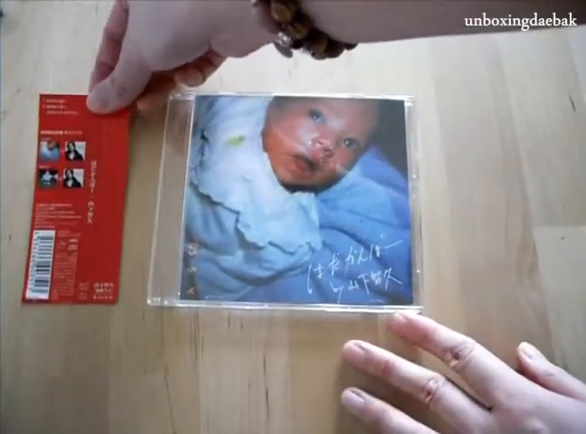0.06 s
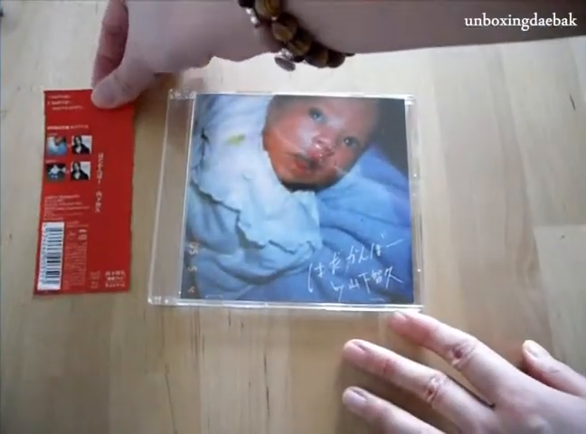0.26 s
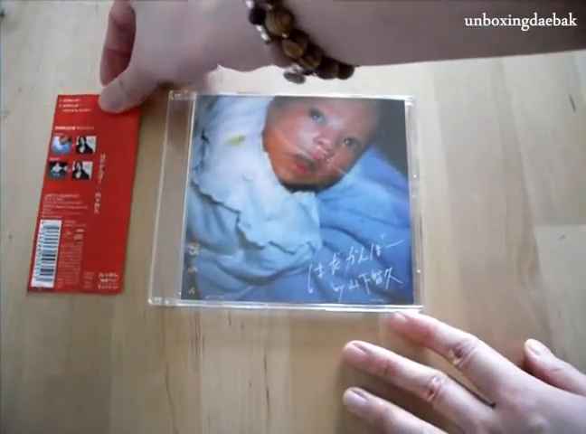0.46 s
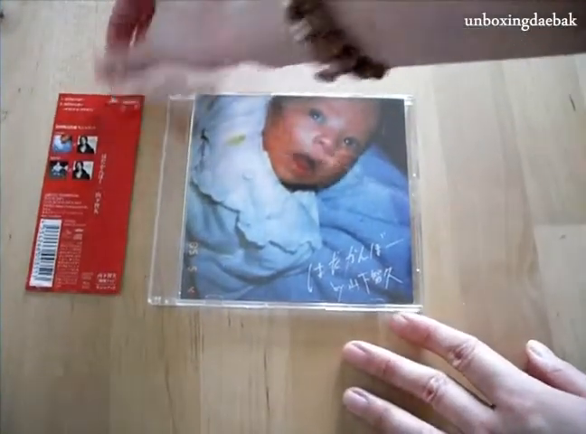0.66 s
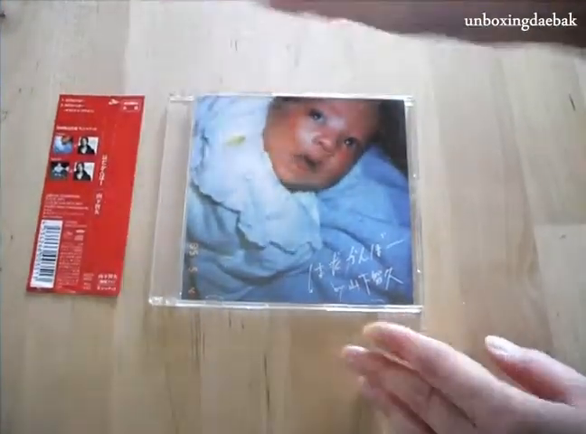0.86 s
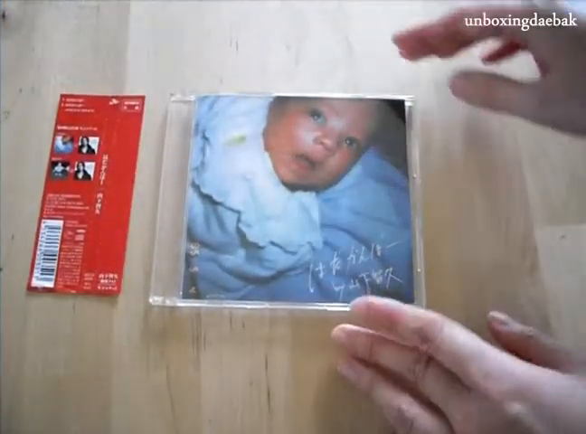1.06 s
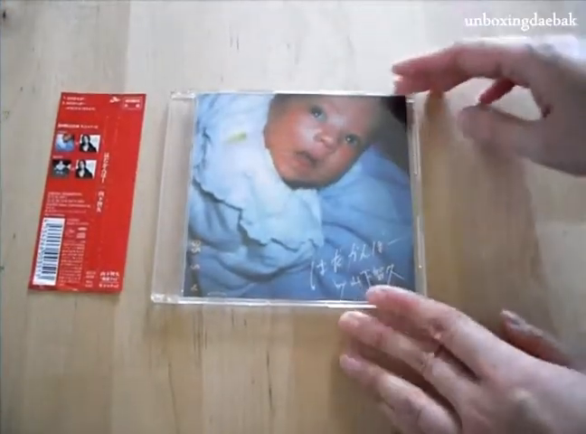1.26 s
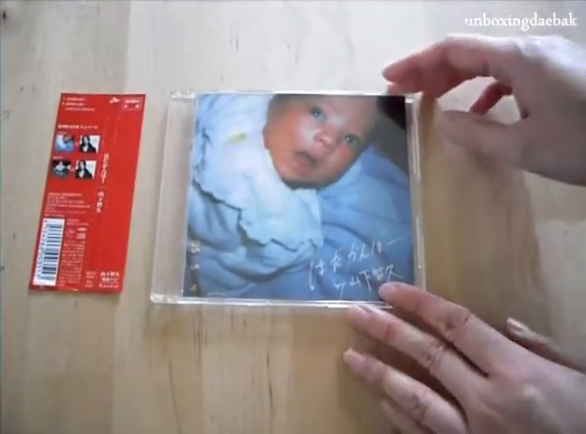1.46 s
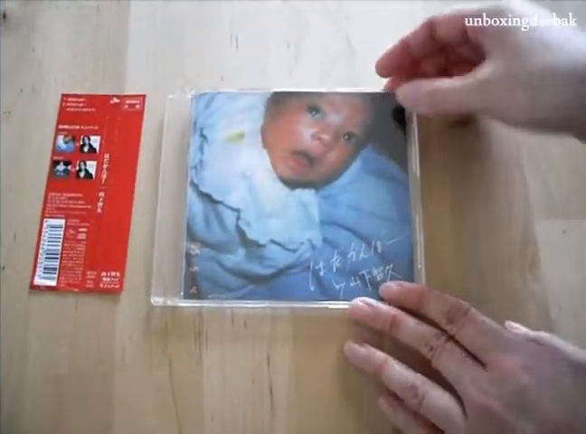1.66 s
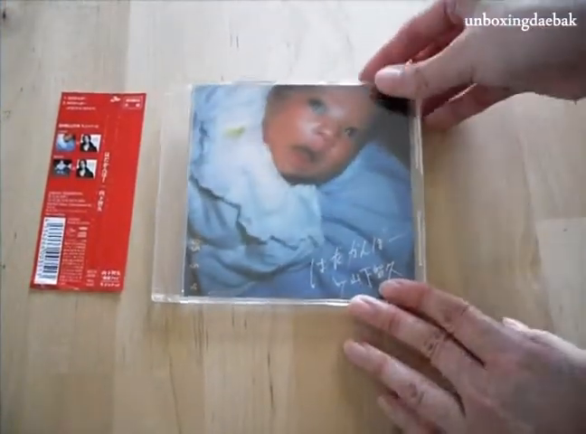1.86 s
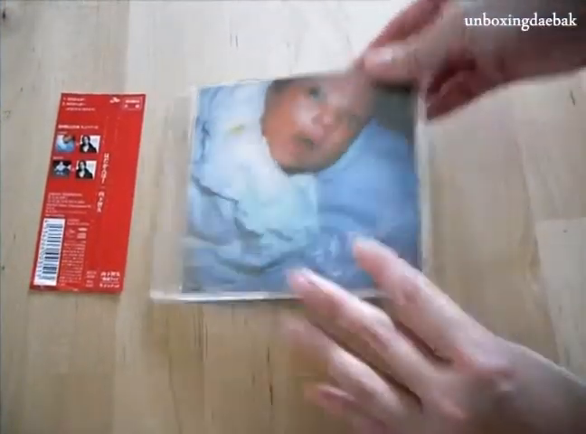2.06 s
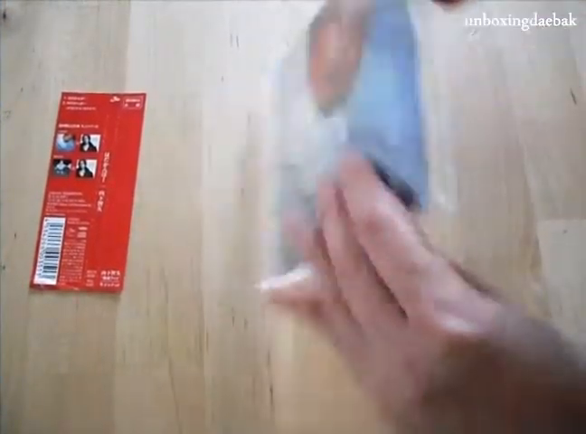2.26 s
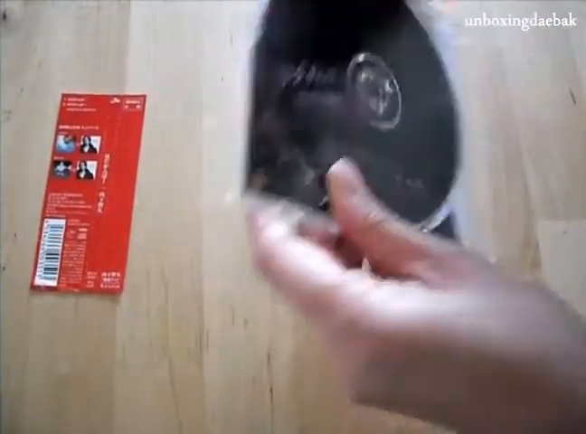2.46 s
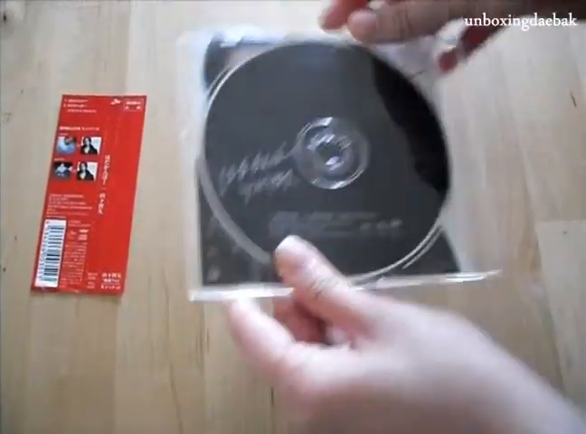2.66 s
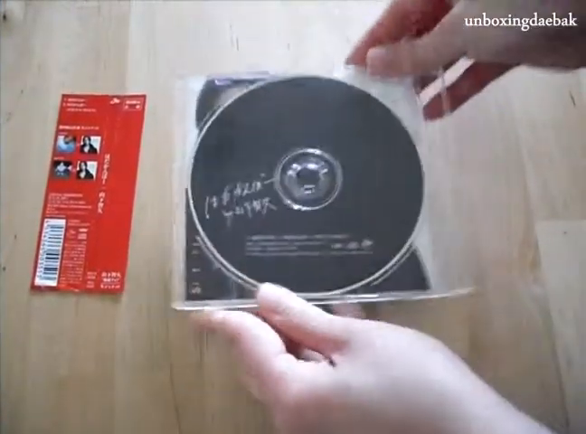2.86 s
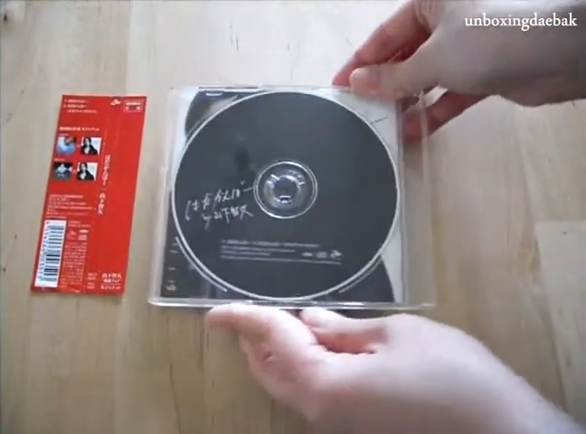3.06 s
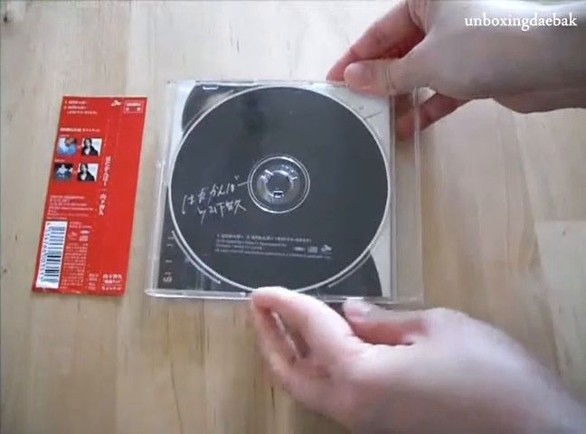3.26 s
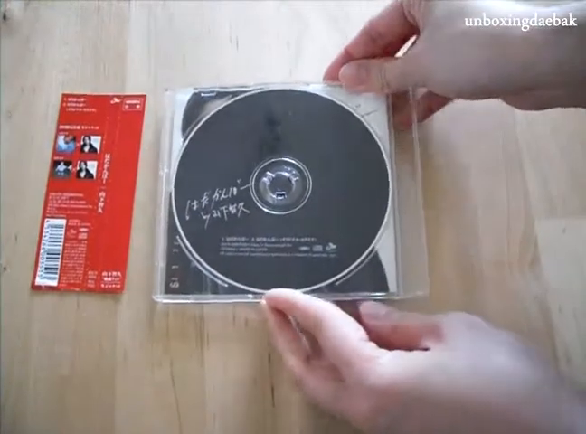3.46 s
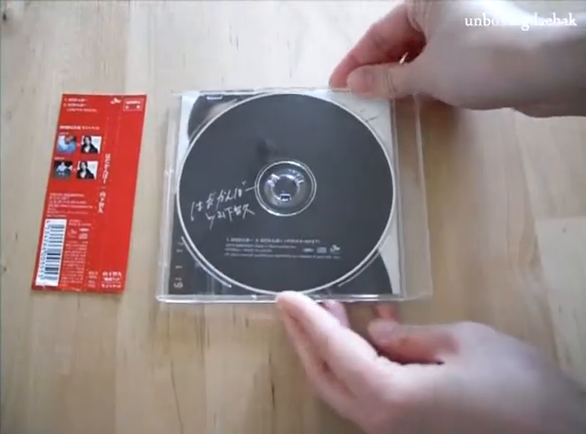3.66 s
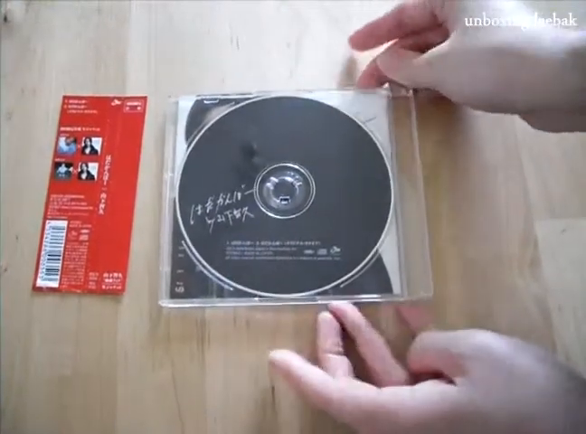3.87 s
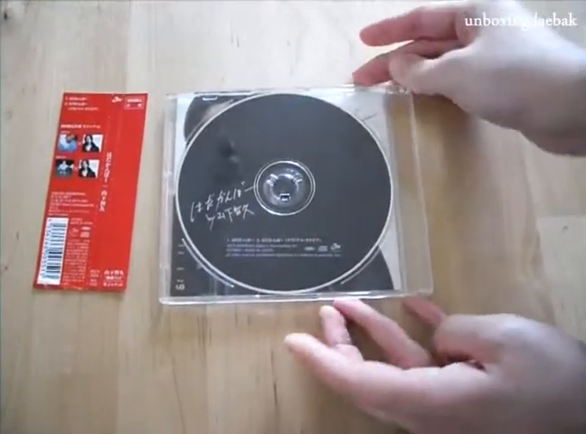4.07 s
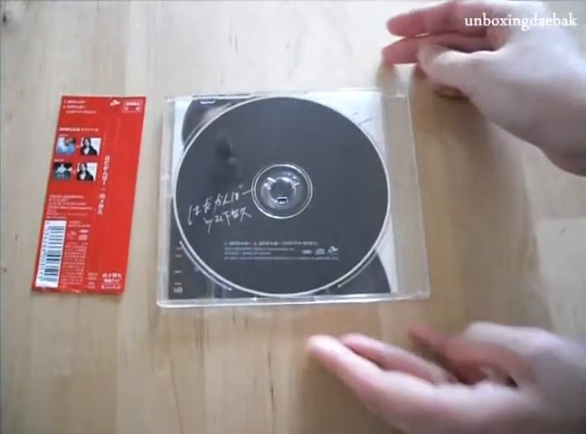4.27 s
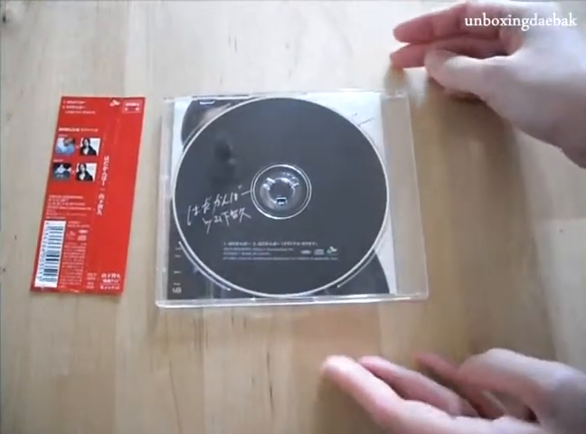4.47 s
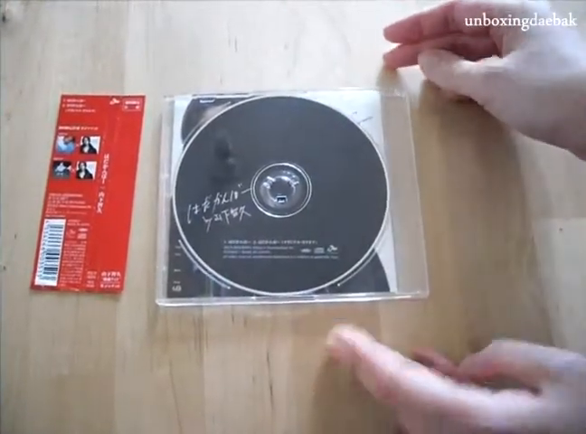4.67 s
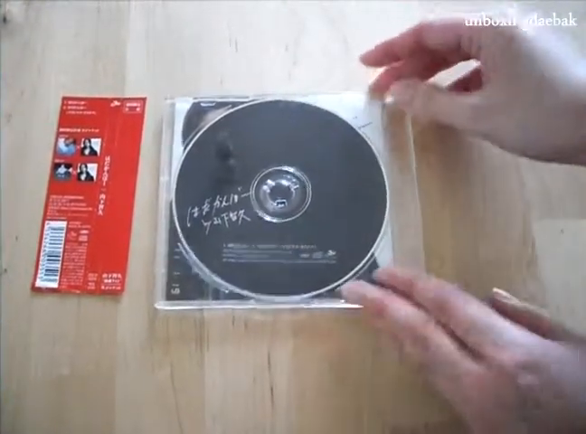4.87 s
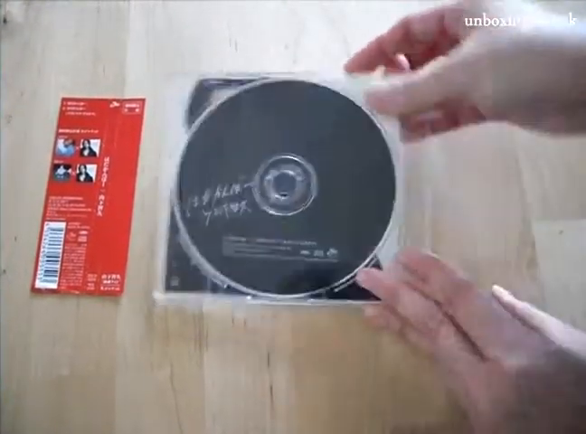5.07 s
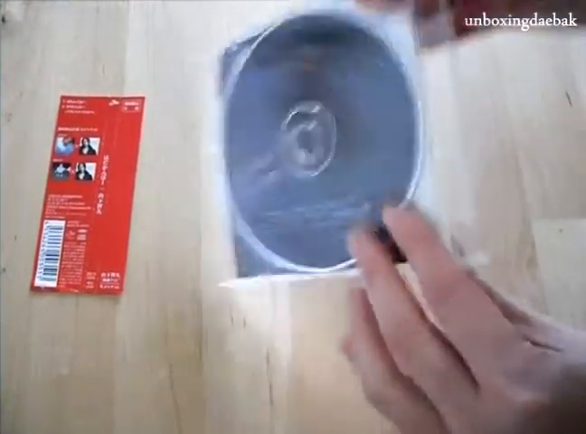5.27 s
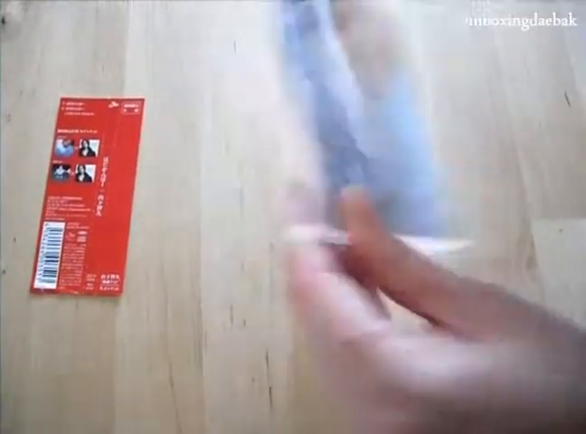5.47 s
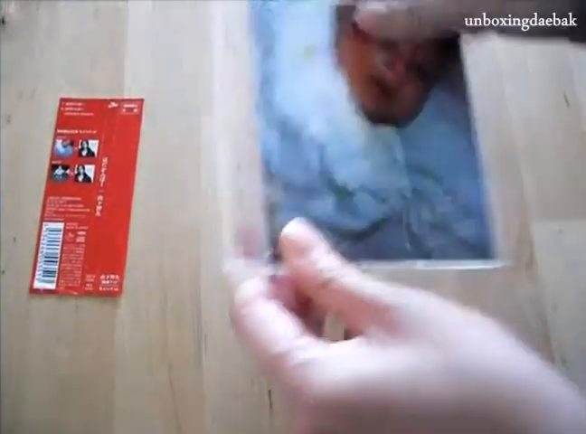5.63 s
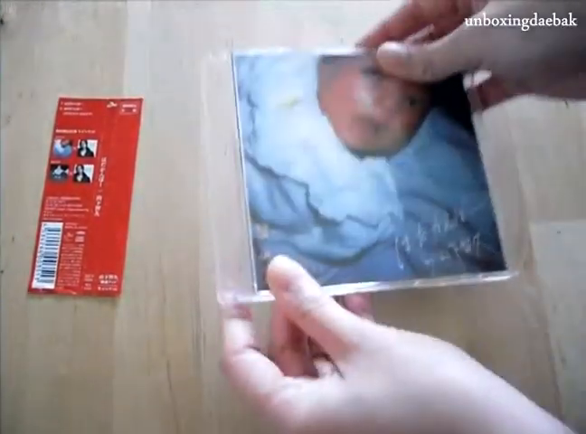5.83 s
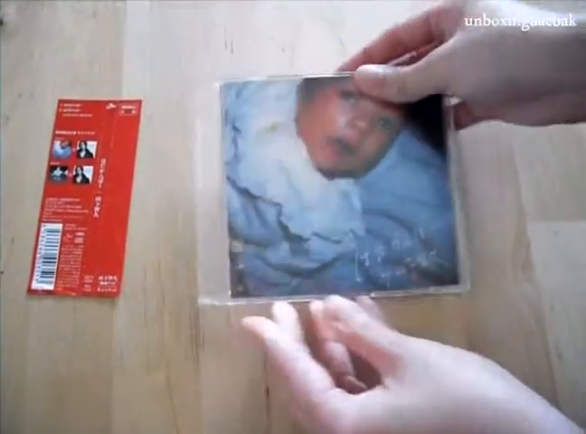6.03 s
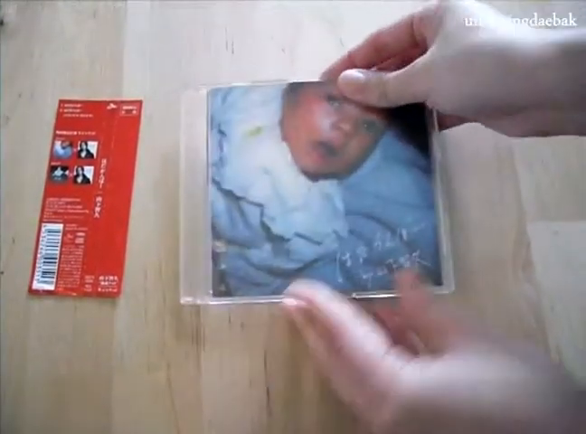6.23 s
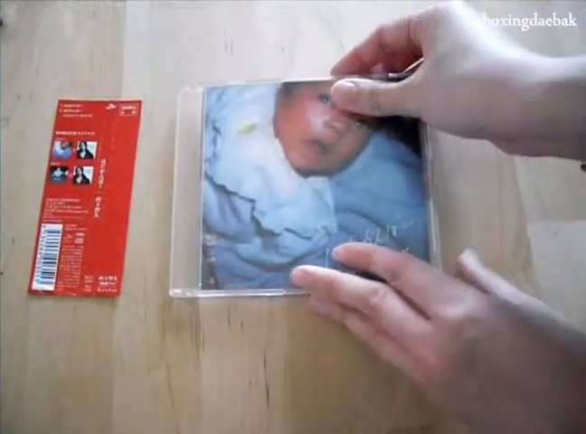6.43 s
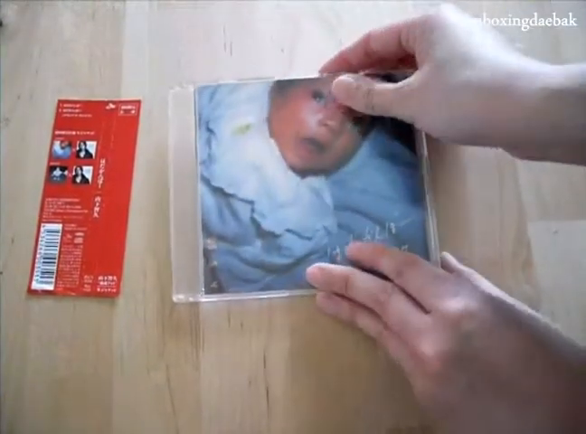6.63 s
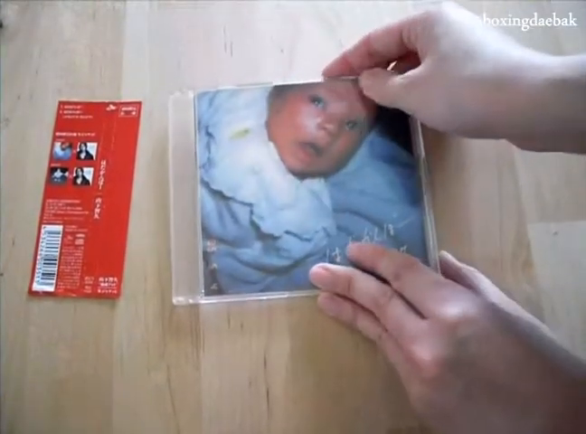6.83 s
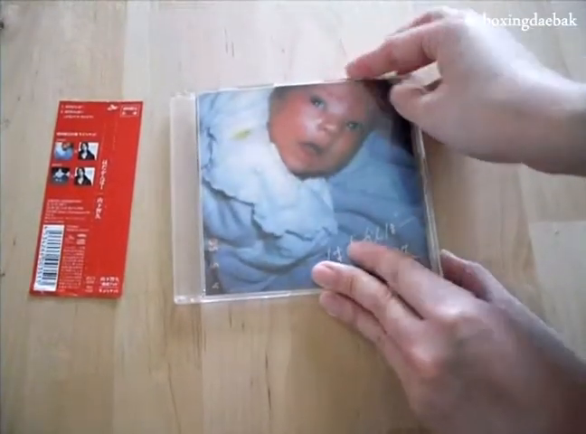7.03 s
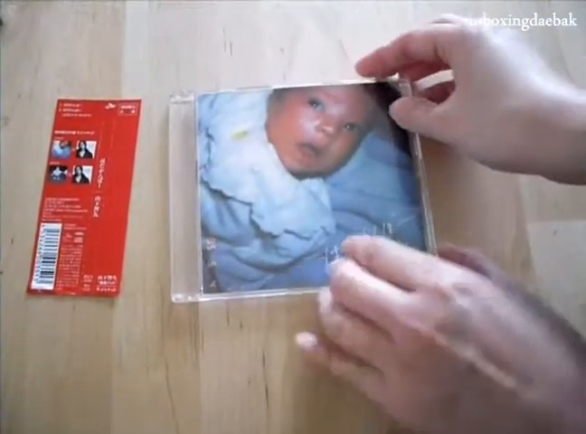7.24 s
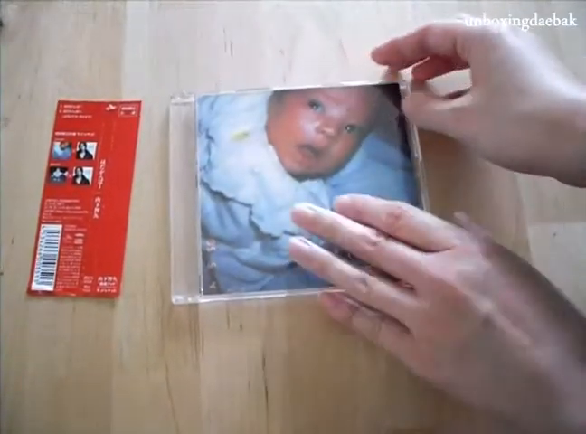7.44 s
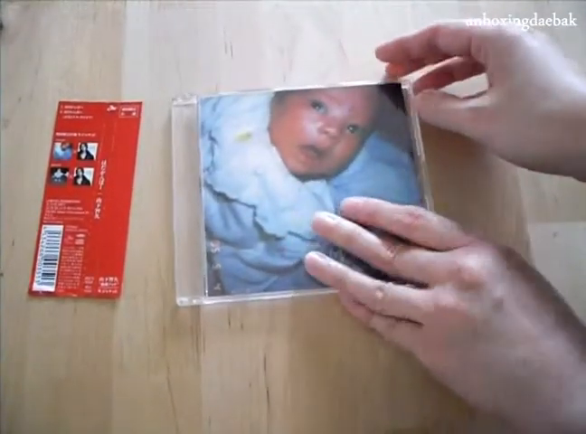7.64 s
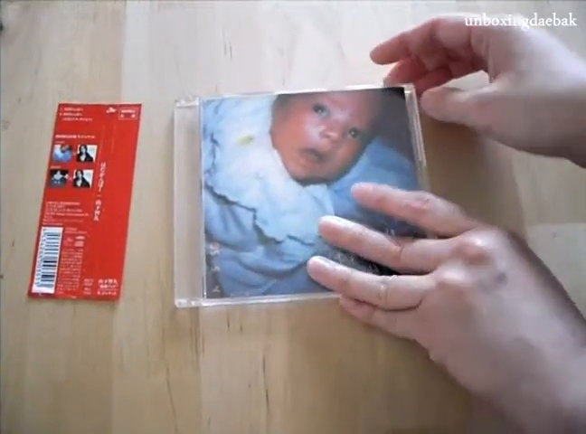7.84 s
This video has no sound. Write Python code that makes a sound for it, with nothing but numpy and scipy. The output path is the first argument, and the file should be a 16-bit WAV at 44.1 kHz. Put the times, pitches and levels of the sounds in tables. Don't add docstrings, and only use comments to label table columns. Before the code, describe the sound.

Close, dry handling of a hard plastic case on a wooden tabletop. Soft paper grit and thin ticks lead to a crisp lifting knock and scrape, then a gentle landing and a dull bump. After a quiet pause come rattling clicks, skin rubs, a snap and a heavy flat landing with quick bounces, then sparse faint taps. Soft room rumble and slightly muffled hiss remain underneath.

```python
import sys
import numpy as np
from scipy import signal
from scipy.fft import rfft, irfft
from scipy.io import wavfile
from scipy.ndimage import uniform_filter1d

SR = 44100
rng = np.random.default_rng(int(sys.argv[2]) if len(sys.argv) > 2 else 0)


def amplitude_ratio(level_db):
    exponent = np.asarray(level_db, float) / 20
    return 10 ** exponent


def output_pcm(signal):
    pcm = np.clip(np.atleast_2d(signal).T, -1, 1) * 32767
    wavfile.write(sys.argv[1], SR, np.round(pcm).astype(np.int16))


N = 348390

SLIP_SPREAD_DB = 1.3


def band(x, lo_hz, hi_hz):
    return signal.sosfilt(signal.butter(3, [lo_hz, hi_hz], "band", fs=SR, output="sos"), x)


def rms(x):
    return np.sqrt(np.mean(x ** 2)) + 1e-12


def fade(t, t60):
    return np.exp(-np.log(1000) * t / np.maximum(t60, .004))


def add(out, x, s):
    i = max(int(s * SR), 0)
    out[i:i + len(x)] += x[:N - i]


def even(x, width_hz):
    spectrum = rfft(x)
    size = max(int(width_hz * len(x) / SR), 1)
    power = uniform_filter1d(np.abs(spectrum) ** 2, size)
    return irfft(spectrum / np.sqrt(power + 1e-18), len(x))


def colour(x, points, near_hz=1000, focus_db=0):
    f = np.log(np.maximum(np.fft.rfftfreq(len(x), 1 / SR), 1))
    hz, db = np.transpose(points)
    lift = focus_db * np.exp(-((f - np.log(near_hz)) / 0.25) ** 2)
    return irfft(rfft(x) * amplitude_ratio(np.interp(f, np.log(hz), db) + lift), len(x))


def slide(s, db, rise, hold, fall):
    return s + np.array([-rise, 0, hold, hold + fall]), db - 20 * np.array([1, 0, 0, 1])


def slips(t, rate, spread_db):
    happens = rng.random(len(t)) < rate / SR
    return happens * rng.standard_normal(len(t)) * amplitude_ratio(spread_db * rng.exponential(size=len(t)))


def judder(t):
    depth_db, spurt_s = 2.5, .006
    spurts = uniform_filter1d(rng.standard_normal(len(t)), int(spurt_s * SR))
    return amplitude_ratio(depth_db * spurts / rms(spurts))


def ring(hz, db, t60):
    t = np.arange(SR // 8) / SR
    turn = 2 * np.pi * (hz[:, None] * t + rng.random((len(hz), 1)))
    return (amplitude_ratio(db)[:, None] * np.sin(turn) * fade(t, t60[:, None])).sum(axis=0)


def body(push, near_hz, t60, focus_db, modes_db):
    # f/Hz, level/dB, ring time as a share of the knock's
    plate_modes = [(880, 17.5, 0.37), (1300, 7.5, 0.19), (1590, -6, 1), (1810, 9, 0.87), (1970, -19, 0.44),
                   (2410, -29, 1.06), (2660, -21, 1.8), (3080, -2, 1.24), (3340, 6, 0.66),
                   (3620, -19, 0.93), (4630, -13, 0.57), (4700, -8, 0.55), (6160, -7.5, 0.67),
                   (7380, -15, 0.81)]
    # f/Hz, width/Hz, level/dB
    wood_modes = [(65, 35, -4.5), (129, 110, -14.5), (248, 53, -1), (412, 71, 3), (504, 78, -4),
                  (700, 96, 9.5), (860, 120, -34)]
    # f/Hz, level/dB per Hz
    plastic_colour = [(290, -50), (500, -12), (1800, 2.5), (2120, 0.5), (2460, 4.5), (2830, -1),
                      (4580, -10), (5540, -16.5), (7230, -19.5), (8850, -25), (10300, -52), (13400, -73),
                      (22000, -120)]
    edge_hz = 4000

    hz, db, share = np.transpose(plate_modes)
    grip = rng.standard_normal((2, len(hz)))
    db = np.append(db + 2.5 * grip[0], focus_db)
    hz = np.append(hz * (1 + 0.0092 * grip[1]), near_hz)
    modes = signal.fftconvolve(even(push, 400), ring(hz, db, t60 * np.append(share, .8)))

    power = signal.fftconvolve(push ** 2, fade(np.arange(SR // 8) / SR, 0.55 * t60) ** 2)
    crack = even(rng.standard_normal(len(power)) * np.sqrt(np.abs(power)), 630)
    crack = colour(crack, plastic_colour, near_hz, focus_db)
    crack = crack * np.clip(np.arange(len(crack))[::-1] / (SR / 20) - 1, 0, 1)
    case = crack / rms(crack) + amplitude_ratio(modes_db) * modes / rms(modes)

    hz, width, db = np.transpose(wood_modes)
    db = db + 5.1 * rng.standard_normal(len(hz))
    wood = signal.fftconvolve(push, ring(hz, db, 1.45 / width))
    return wood, band(case, 1020, edge_hz), band(case, edge_hz, 12600)


def knocks():
    # t/s, peak level/dB, loudest ring f/Hz, table thud level/dB, ring/s
    hard_knocks = [
        (2.0421, -6.5, 1810, -16.5, 0.015),
        (3.5513, -33, 2620, -10, 0.036),
        (5.0665, -32.5, 2360, -11.5, 0.045),
        (5.0825, -36, 2310, -10, 0.11),
        (5.4692, -21.5, 2330, -9.5, 0.014),
        (5.5077, -31.5, 1820, -10.5, 0.022),
        (5.7153, -23, 3300, -20, 0.0055),
        (5.9936, -21, 2620, -3.5, 0.027),
    ]
    # t/s, peak level/dB, loudest ring f/Hz, table thud level/dB, ring/s
    flat_landings = [
        (3.328, -24.5, 2260, -26, 0.023),
        (5.7148, -22.5, 2180, -34, 0.044),
        (5.984, -7, 1540, -20, 0.043),
        (6.0879, -18, 2300, -17, 0.025),
        (6.1174, -35, 1440, -11, 0.028),
    ]
    # t/s, peak level/dB, loudest ring f/Hz, edge brightness/dB
    light_clicks = [(2.2088, -33, 2250, -22), (2.2135, -35.5, 2080, -22), (2.389, -40.5, 1820, -15),
                    (4.93, -45.5, 1590, -22), (5.019, -37, 1420, -21), (5.2703, -37.5, 2080, -14.5),
                    (5.2919, -43.5, 1190, -10.5), (5.3754, -47, 1830, -5), (5.477, -33, 1800, -17),
                    (5.5164, -36, 2870, -9.5), (5.5427, -46, 2240, -27), (5.593, -41, 2170, -14),
                    (5.677, -38.5, 1800, -18), (5.7602, -54, 2430, -7), (6.8092, -39.5, 1590, -17.5),
                    (7.029, -39, 1310, -26), (7.049, -38.5, 1770, -18), (7.856, -47, 3580, -16),
                    (2.106, -31, 2200, -14)]

    # edge brightness in dB, lift of the loudest ring in dB
    hits = [(*row, -16, 6.5) for row in hard_knocks]
    hits += [(*row, -18, 6) for row in flat_landings]
    click_thud_db, click_ring_s = -12, 0.029
    hits += [(s, db, hz, click_thud_db, click_ring_s, edge_db, 12) for s, db, hz, edge_db in light_clicks]

    out, t = np.zeros(N), np.arange(SR // 200) / SR
    for s, db, hz, thud_db, t60, edge_db, focus_db in hits:
        chatter = rng.standard_normal(len(t)) ** 3 * (t / .0008) * np.exp(-t / 0.0012)
        parts = body(chatter, hz, t60, focus_db, modes_db=-6.5)
        thud, plate, edge = [p / np.abs(p).max() for p in parts]
        add(out, amplitude_ratio(db) * (amplitude_ratio(thud_db) * thud + plate + amplitude_ratio(edge_db + 11.0) * edge), s)
    return out


def rings():
    # t/s, f/Hz, peak level/dB, ring time/s
    free_modes = [(2.046, 1300, -21, 0.046), (2.043, 404, -28, 0.045), (3.329, 2410, -31, 0.018),
                  (3.552, 2620, -52, 0.033), (5.22, 1956, -40, 0.13), (5.471, 798, -39.5, 0.063),
                  (5.471, 225, -42, 0.11), (5.51, 786, -43, 0.068), (5.716, 2130, -22.5, 0.027),
                  (5.716, 1850, -28, 0.033), (5.716, 3330, -29, 0.019), (5.986, 880, -23, 0.041),
                  (5.985, 251, -28.5, 0.071), (5.989, 2660, -29, 0.13), (5.987, 2410, -24, 0.079),
                  (3.329, 700, -47, 0.044), (5.716, 610, -43, 0.028), (6.088, 1350, -19.5, 0.021),
                  (6.089, 233, -46.5, 0.13)]
    out, t = np.zeros(N), np.arange(SR // 4) / SR
    for s, hz, db, t60 in free_modes:
        flutter = uniform_filter1d(rng.standard_normal(len(t)), SR // 200)
        swell = fade(t, t60) * (1 - np.exp(-t / .001)) * amplitude_ratio(3.0 * flutter / rms(flutter))
        add(out, amplitude_ratio(db) * np.sin(2 * np.pi * hz * t) * swell, s)
    return out


def rubs():
    # loudest t/s, level/dB, rise/s, fall/s, strongest f/Hz
    edge_rubs = [(2.054, -33, .004, 0.025, 1670), (2.692, -62, 0.044, 0.055, 1550),
                 (3.724, -57, 0.13, 0.071, 1900), (3.933, -55, 0.079, 0.017, 1500),
                 (4.866, -53, 0.048, 0.067, 1650), (5.209, -38, .025, 0.023, 2570),
                 (5.222, -37, .02, 0.012, 2000), (5.376, -47.5, 0.072, .018, 2170),
                 (5.885, -56, 0.076, .14, 2000), (5.996, -29, .003, 0.055, 2600),
                 (6.1, -42, .004, 0.061, 1740), (6.607, -55, 0.032, .02, 2400),
                 (7.192, -56, 0.011, 0.036, 1300), (2.225, -57, .05, 0.093, 2200),
                 (7.049, -54, 0.037, 0.024, 1760), (7.558, -56, 0.061, .025, 1530),
                 (7.84, -58.5, .06, 0.13, 1600)]
    # t/s, level/dB
    drag_pressure = [
        (2.092, -50),
        (2.103, -40),
        (2.111, -34),
        (2.159, -31),
        (2.168, -35.5),
        (2.174, -45),
        (2.181, -34.5),
        (2.19, -45),
        (2.2, -56),
    ]

    # times, levels, strongest Hz, edge dB, thud dB
    contacts = [(*slide(s, db, rise, 0.00055, fall), hz, -8, -18) for s, db, rise, fall, hz in edge_rubs]
    contacts.append((*np.transpose(drag_pressure), 2230, -4, -16.5))

    out = np.zeros(N)
    for s, db, hz, edge_db, thud_db in contacts:
        t = np.arange(s[0], s[-1], 1 / SR)
        jerks = slips(t, 5000, SLIP_SPREAD_DB)
        parts = body(jerks, hz, 0.028, focus_db=3.0, modes_db=-5)
        thud, plate, edge = [p[:len(t)] / rms(p[:len(t)]) for p in parts]
        both = amplitude_ratio(thud_db) * thud + plate + amplitude_ratio(edge_db) * edge * judder(t)
        both = both * judder(t)
        add(out, signal.windows.tukey(len(t), .12) * amplitude_ratio(np.interp(t, s, db)) * both, s[0])
    return out


def strokes():
    # t/s, level/dB, rise/s, hold/s, fall/s
    finger_strokes = [
        (0.95, -63.5, 0.074, 0.023, .012),
        (1.886, -46.5, .05, 0.046, 0.027),
        (1.958, -59, 0.0088, 0.047, .016),
        (5.028, -50.5, 0.062, .003, 0.042),
        (5.132, -51, .015, 0.05, 0.01),
        (6.28, -53.5, 0.037, .005, 0.085),
        (6.496, -50.5, 0.056, 0.027, .02),
    ]
    # f/Hz, width/Hz, level/dB
    lid_hollow = [(1420, 520, 6.5), (2020, 470, -0.5), (2620, 740, 2.5), (3960, 290, 7.5), (4700, 160, -14),
                  (6130, 160, -10), (6680, 240, -11), (8250, 300, -8)]
    bright_db = -2.5
    out = np.zeros(N)
    for row in finger_strokes:
        s, db = slide(*row)
        t = np.arange(s[0], s[-1], 1 / SR)
        skin = slips(t, 4500, SLIP_SPREAD_DB)
        hollow = np.zeros(len(t))
        for hz, width, gain_db in lid_hollow:
            gain = amplitude_ratio(gain_db + 0.66 * rng.standard_normal())
            hollow += gain * signal.lfilter(*signal.iirpeak(hz, hz / width, fs=SR), skin)
        low, high = band(hollow, 910, 3650), band(hollow, 3410, 7500)
        both = low / rms(low) + amplitude_ratio(bright_db) * high / rms(high) * judder(t)
        add(out, signal.windows.tukey(len(t), .12) * amplitude_ratio(np.interp(t, s, db)) * both, s[0])
    return out


def singing():
    # middle t/s, f/Hz, peak level/dB, length/s
    sung_modes = [
        (5.015, 1480, -52, 0.068),
        (5.205, 1080, -48, 0.12),
        (5.17, 2600, -49, 0.1),
    ]
    out = np.zeros(N)
    for s, hz, db, length in sung_modes:
        t = np.arange(int(length * SR))
        tone = band(rng.standard_normal(SR // 4), hz - 70, hz + 70)[-len(t):]
        add(out, amplitude_ratio(db) * np.hanning(len(t)) * tone / rms(tone), s - length / 2)
    return out


def ticks():
    # t/s, peak level/dB, centre f/Hz, length/s
    bright_ticks = [
        (0.288, -50.5, 4300, 0.036),
        (0.347, -43, 4960, 0.035),
        (1.649, -45.5, 4630, 0.049),
        (1.6831, -46, 4840, 0.03),
        (7.139, -48, 5000, 0.025),
    ]
    out, t = np.zeros(N), np.arange(SR // 10) / SR
    for s, db, hz, t60 in bright_ticks:
        tick = band(rng.standard_normal(len(t)) * fade(t, t60), .78 * hz, 1.27 * hz)
        add(out, amplitude_ratio(db) * tick / np.abs(tick).max(), s)
    return out


def paper():
    # t/s, level/dB, rise/s, hold/s, fall/s
    paper_slides = [
        (0.014, -60, 0.014, .002, 0.025),
        (0.072, -67.5, .025, 0.13, 0.055),
        (0.35, -58, 0.094, .002, .014),
        (0.494, -64.5, .08, .004, 0.038),
    ]
    t = np.arange(N) / SR
    grit = band(slips(t, 6000, 2.7), 3500, 6160)
    pressure = sum(amplitude_ratio(np.interp(t, *slide(*row), left=-120, right=-120)) for row in paper_slides)
    return pressure * grit / rms(grit)


def room(x):
    t60_s, wash_db = 0.2, -16
    t = np.arange(SR // 2) / SR
    wash = rng.standard_normal(len(t)) * fade(t, t60_s) * (t > .004)
    wash = band(even(wash, 82), 150, 12000)
    return amplitude_ratio(wash_db) * signal.fftconvolve(x, wash / np.sqrt(np.sum(wash ** 2)))[:N]


def air():
    # f/Hz, level/dB per Hz
    air_colour = [(12, -29), (20, 3), (162, -5.5), (194, -6), (319, -7), (460, -8), (907, -12),
                  (1240, -13.5), (1490, -15), (2650, -18), (5500, -26), (7140, -32), (10300, -44.5),
                  (13400, -66), (22000, -120)]
    # f/Hz, width/Hz, level/dB
    hum_tones = [(190.3, 13, -69), (234.2, 30, -72.5), (470, 5.4, -73), (1290, 7.6, -72.5)]
    air_db = -55
    hiss = colour(rng.standard_normal(N), air_colour)
    swell = uniform_filter1d(rng.standard_normal(N), SR // 3)
    out = amplitude_ratio(air_db + .4 * swell / rms(swell)) * hiss / rms(hiss)
    for hz, width, db in hum_tones:
        tone = band(rng.standard_normal(N), hz - width / 2, hz + width / 2)
        out += amplitude_ratio(db) * tone / rms(tone)
    return out


def scene():
    case = knocks() + rings() + rubs() + strokes() + singing() + ticks() + paper()
    return (case + room(case) + air())[None]


def roll_off(x):
    return signal.sosfilt(signal.butter(12, 10470, fs=SR, output="sos"), x)


def record(dry):
    dip = dry - .76 * signal.lfilter(*signal.iirpeak(5500, 9.5, fs=SR), dry)
    top_hz = 10900
    mix = signal.sosfilt(signal.cheby2(10, 50, top_hz, fs=SR, output="sos"), dip)
    return roll_off(mix)


dry = scene()
out = record(dry)
output_pcm(out)
```